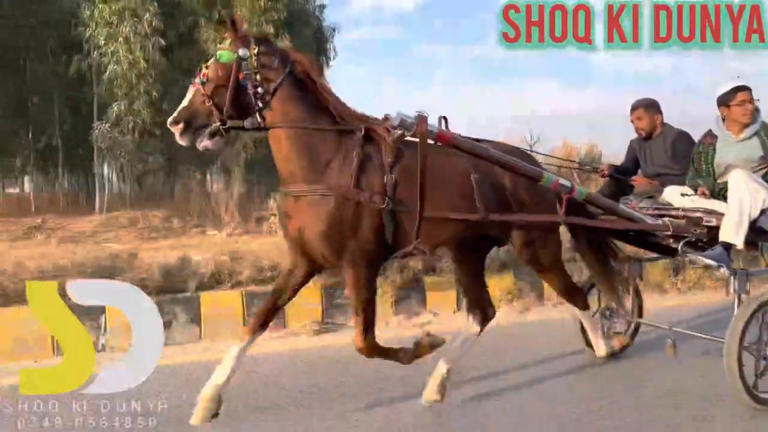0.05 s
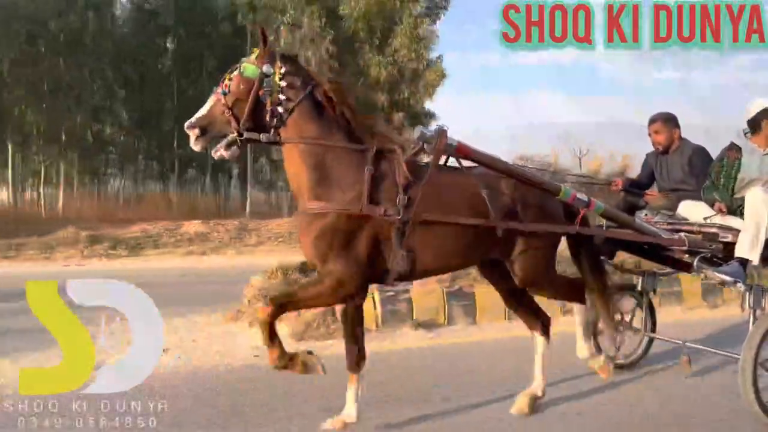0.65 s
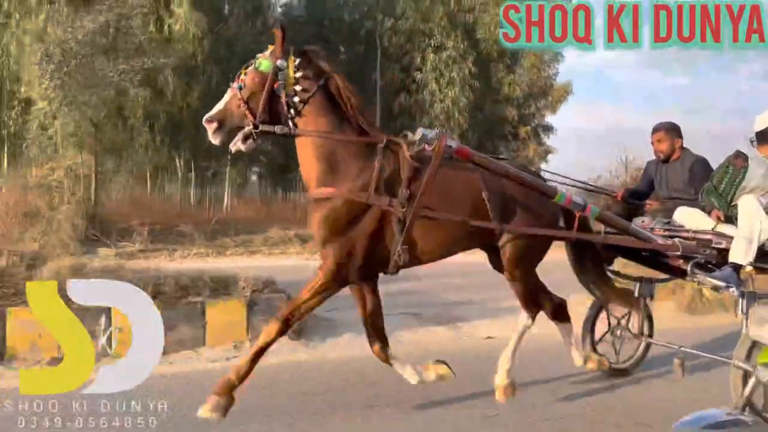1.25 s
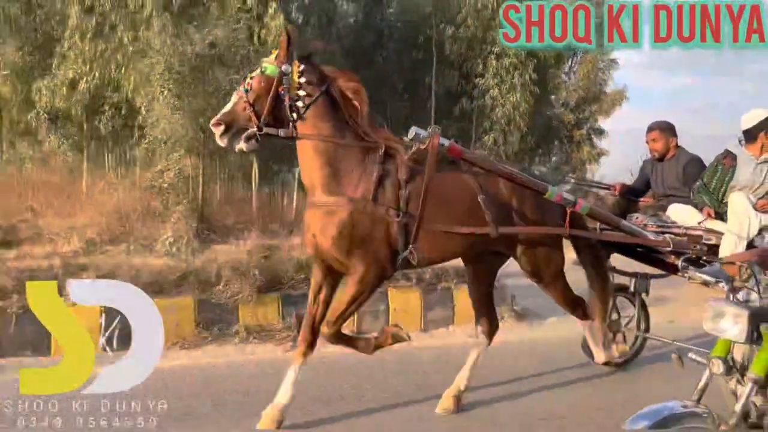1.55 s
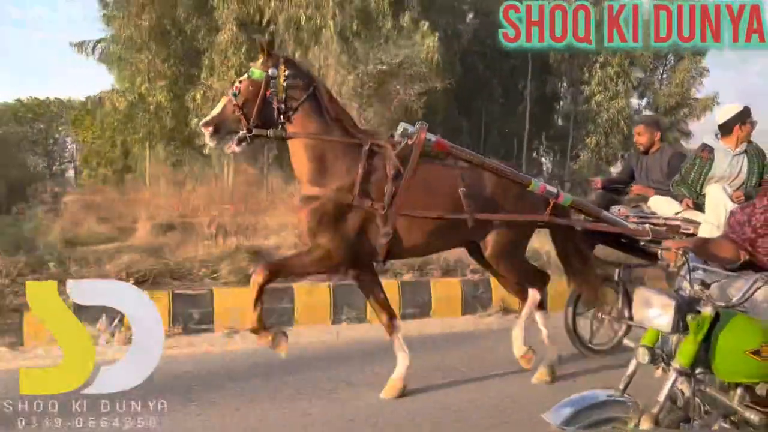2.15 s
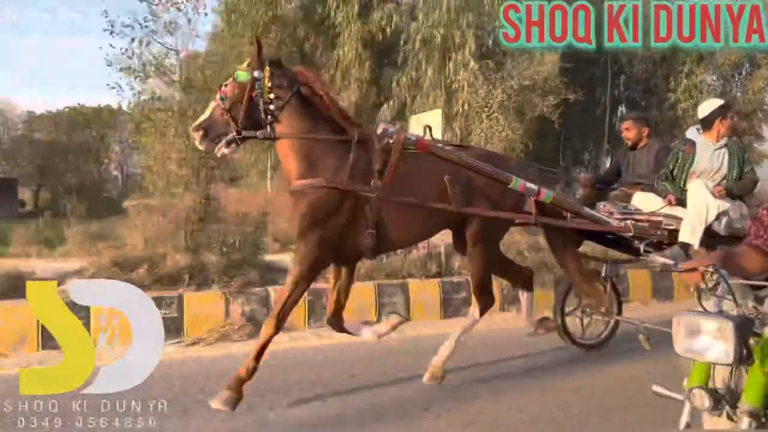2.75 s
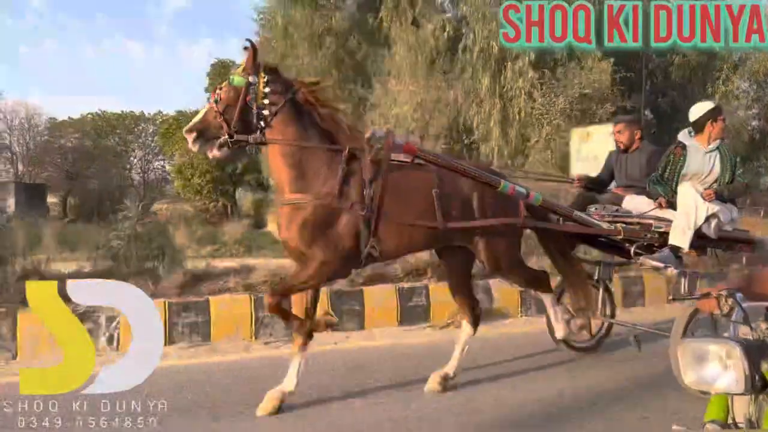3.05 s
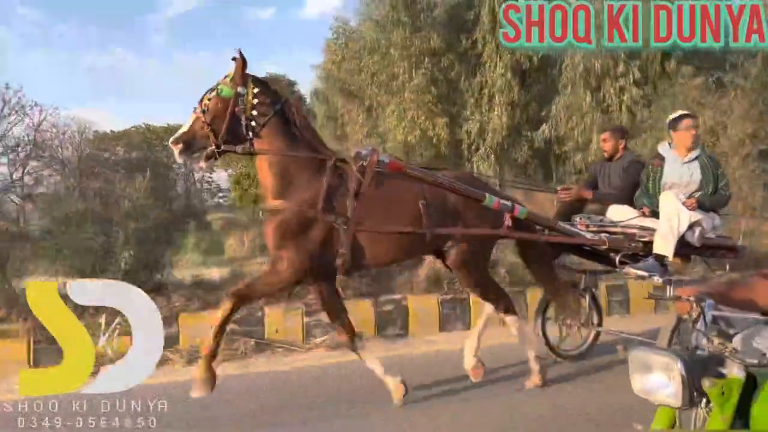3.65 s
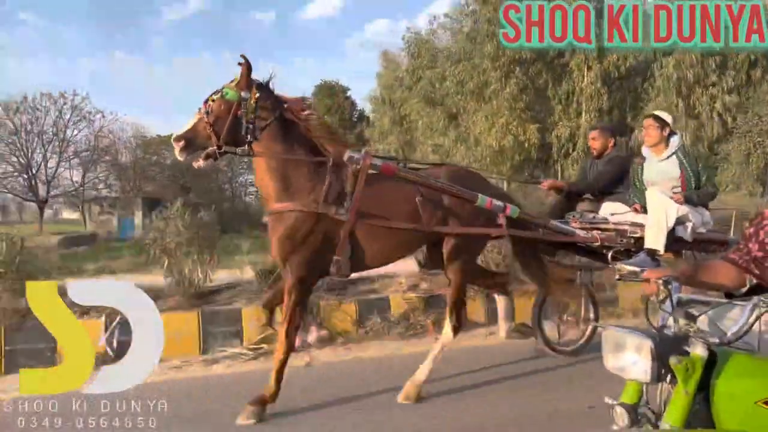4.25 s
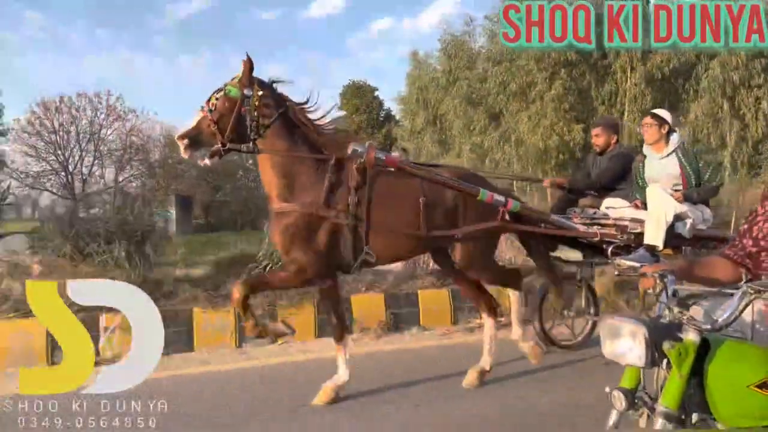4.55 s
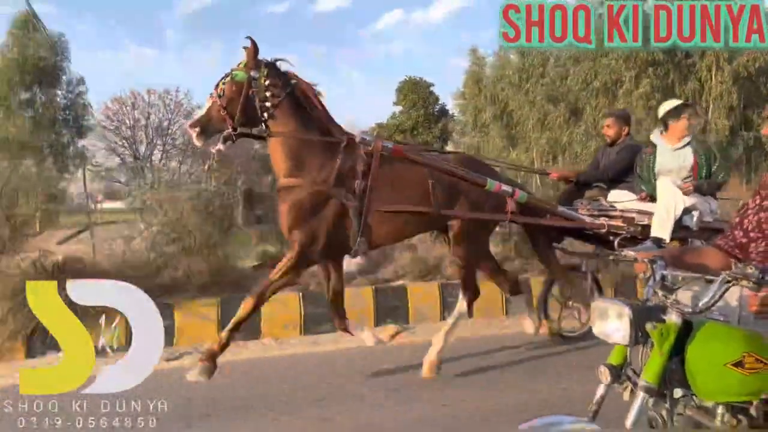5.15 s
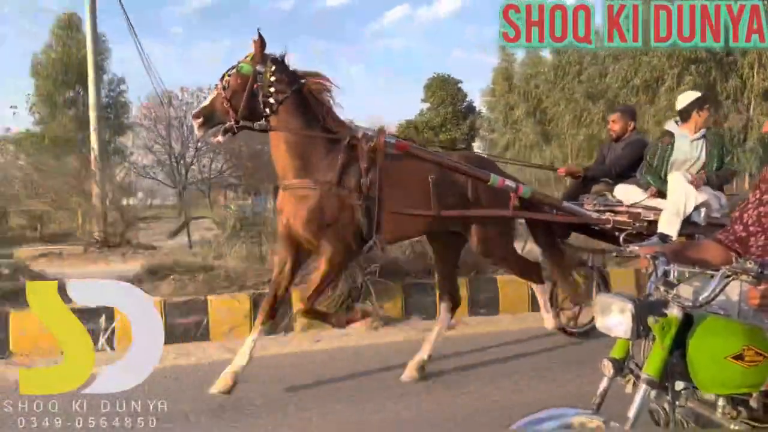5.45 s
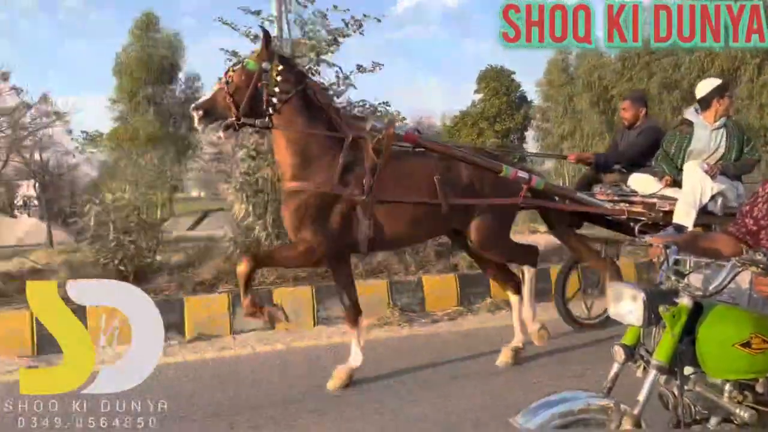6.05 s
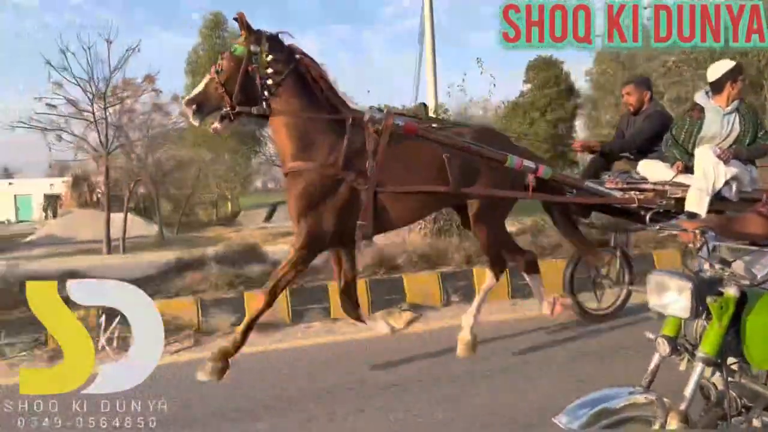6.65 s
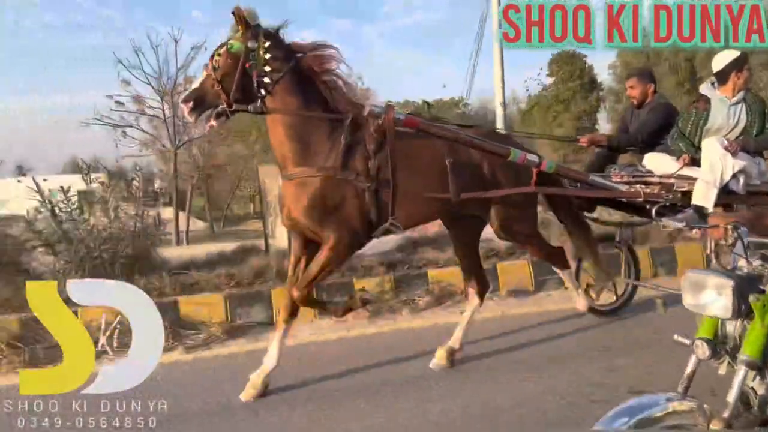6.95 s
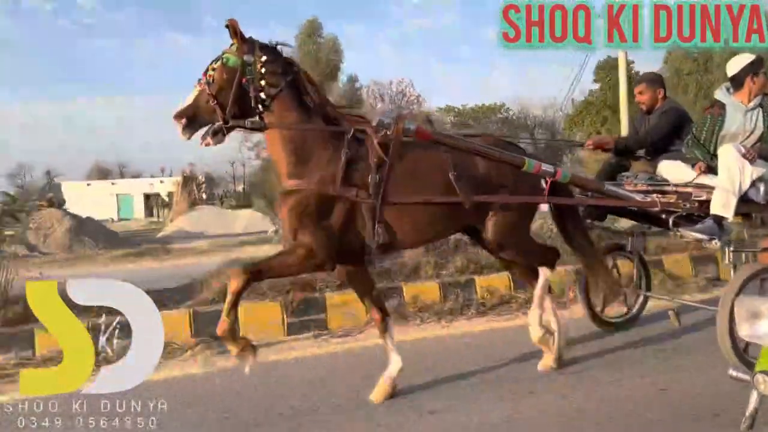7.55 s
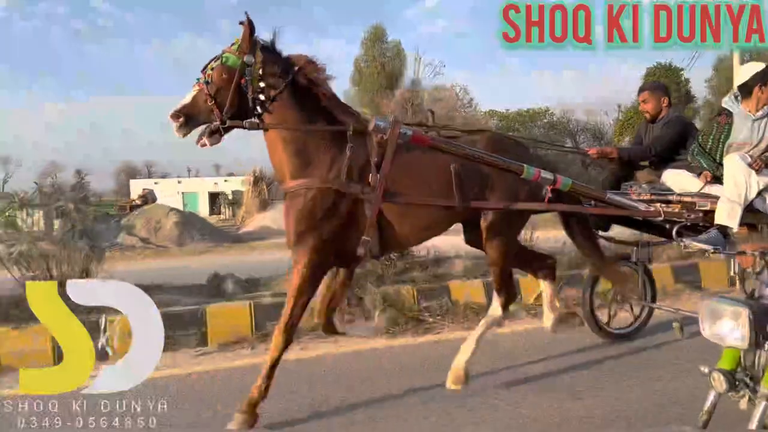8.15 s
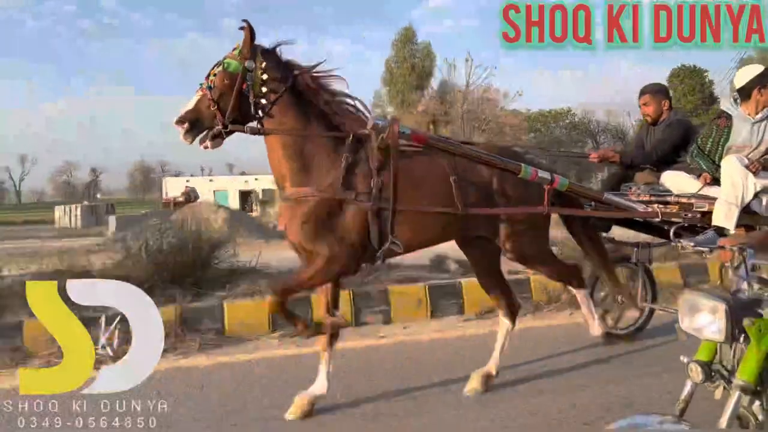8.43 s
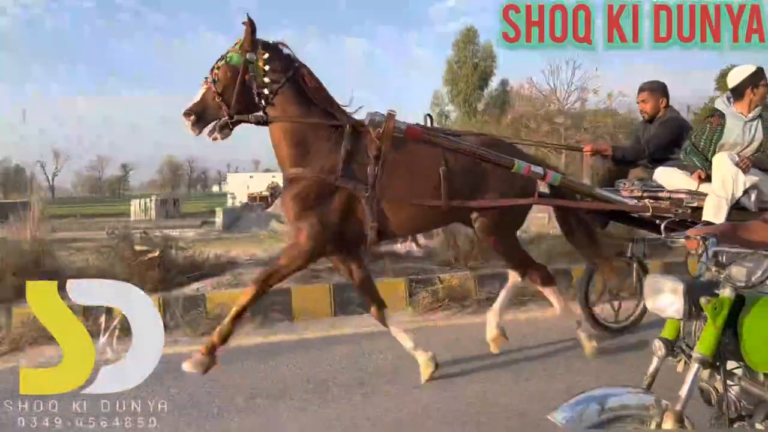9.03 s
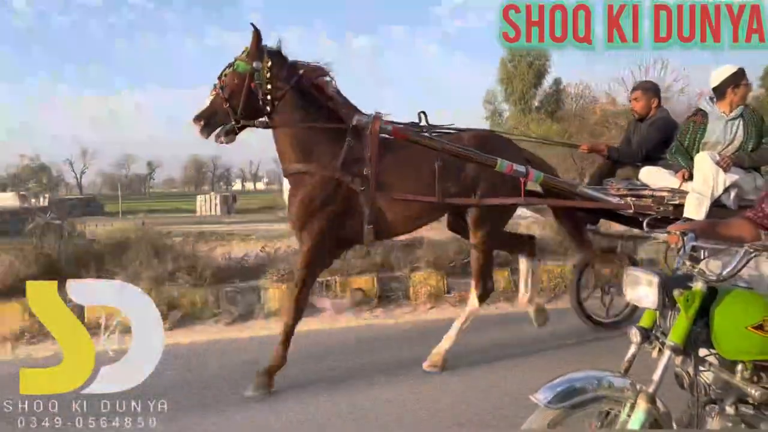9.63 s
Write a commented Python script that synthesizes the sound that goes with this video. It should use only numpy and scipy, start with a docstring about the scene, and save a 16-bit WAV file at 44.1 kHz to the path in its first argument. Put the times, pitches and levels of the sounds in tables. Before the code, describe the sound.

Sharp, hollow hoofbeats keep an even trot on a paved road from start to finish, mixed with small rattles and dull knocks from a cart. Beneath them run the low, steady putter of a motorcycle, a faint whine that comes and goes, and tyre noise. Everything is heard outdoors from a vehicle keeping pace, with wind rumbling on the microphone and stronger gusts early and late.

```python
"""On an asphalt road, a trotting horse pulls a light cart, heard from a vehicle that keeps pace with it.
The hooves land in pairs, one just after the other: iron shoes clack, hollow hooves clop, sand crunches.
The cart knocks and rattles. A one-cylinder motorcycle thumps alongside, one puff for each firing,
with a faint gear whine. Behind it all, tyres roar and hiss and gusts of wind hit the microphone."""
import sys
import numpy as np
from scipy import signal
from scipy.fft import rfft, irfft, next_fast_len
from scipy.io import wavfile
from scipy.ndimage import uniform_filter1d

SR = 44100
rng = np.random.default_rng(int(sys.argv[2]) if len(sys.argv) > 2 else 0)


def store_wav(level_fs):
    """Save 16-bit WAV to argv[1]."""
    pcm = np.round(np.clip(np.atleast_2d(level_fs), -1, 1) * 32767)
    wavfile.write(sys.argv[1], SR, pcm.T.astype(np.int16))


N = 431738
TIME = np.arange(N) / SR
SHORT_TIME = np.arange(4096) / SR  # clock for one short sound
SKID_S = .015  # a burst starts this long before its crack


# Tone colours of iron on stone, the dull body of the blow, and crushed sand: f/Hz, level/dB
CLACK_COLOUR = [(900, -3), (2000, 2), (3200, 11), (4600, 12), (5400, 11), (6700, 13.5), (8200, 5.5),
                (10000, -1), (14000, -38)]
CLOP_COLOUR = [(200, -15), (500, -1), (850, 11.5), (1200, 6), (1700, -8), (2600, 6), (4000, -56),
               (8000, -47)]
GRIT_COLOUR = [(5000, 1), (8500, 13), (10000, 5), (11300, 13.5), (13000, 2.5), (15500, 5.5), (16500, -34)]
# Light scuffs of a toe leaving the road: t/s, level/dB
TOE_SCUFFS = [(3.497, -29), (4.6464, -23), (6.4444, -25)]

def hooves():
    """The shoe's edge ticks, sand snaps, iron cracks on stone, then the hoof and the shoe ring."""
    usual_db, toe_ahead_s, snap_ahead_s = -29, .0075, .0007
    lean_left = amp([[1.6], [-1.9]])
    out = np.zeros((2, N))
    for s, db, extra_grit_db, clop_db, clop_hz, toe_db in landings():
        grit_db = usual_db + 6.5 + .35 * (db - usual_db)  # hard steps gain more clack than grit
        clack = amp(3.5) * burst(CLACK_COLOUR, lead=.002, decay=.0033, tail_db=-12, tail_decay=.011)
        clop = amp(-2) * burst(CLOP_COLOUR, lead=.002, decay=.0075, tail_db=-9, tail_decay=.016)
        snap_s = rng.uniform(.0008, .0016)
        grit = 1.6 * burst(GRIT_COLOUR, lead=.0004, decay=snap_s, tail_db=-19, tail_decay=.011)
        toe = burst(GRIT_COLOUR, lead=.0002, decay=.0012, tail_db=-10, tail_decay=.007)
        add(clack, SKID_S, shoe_ring())
        add(clop, SKID_S, hoof_ring(clop_hz))
        start = s - SKID_S
        add(out, start, (amp(db) * clack + amp(clop_db) * clop) * lean_left)
        add(out, start - snap_ahead_s, amp(grit_db + extra_grit_db) * grit)
        add(out, start - toe_ahead_s, amp(grit_db + toe_db) * toe)
    for s, db in TOE_SCUFFS:
        scuff = burst(CLACK_COLOUR, lead=.005, decay=.011, tail_db=-12, tail_decay=.014)
        add(out, s - SKID_S, amp(db - 13) * scuff)
    return out


# Beats of the trot, each made by a front hoof and the opposite back hoof. Columns:
# second hoof t/s; first hoof's head start t/s, level/dB;
# second hoof's level/dB, extra grit level/dB, clop level/dB, clop f/Hz
TROT = [(0.1503, 0.0215, -30, -20, 0, -26, 824), (0.395, 0.017, -33, -31, -11, -39, 640),
        (.634, 0.026, -27.5, -20, -4, -28, 816), (0.8972, 0.024, -37, -32, -3, -24, 820),
        (1.1174, 0.024, -27, -21, 1, -25, 1020), (1.4005, 0.037, -30.5, -35, 7.5, -42, 1720),
        (1.5898, 0.028, -63, -20.5, -1.5, -22.5, 716), (1.8491, 0.0055, -39, -36, -3, -32, 860),
        (2.0815, 0.008, -24.5, -18, -1, -23, 646), (2.339, .012, -32, -33, 1, -26.5, 950),
        (2.5859, 0.024, -26.5, -21.5, 0.5, -20.5, 940), (2.85, 0.025, -32, -29, -4, -40, 1030),
        (3.07, 0.0091, -27, -20, -7, -21, 1320), (3.3511, 0.039, -37, -28, 0, -26, 1020),
        (3.5504, 0.0071, -28, -19, -4, -16.5, 905), (3.835, .048, -36, -38, 2, -35, 900),
        (4.0341, 0.027, -55, -18, 0.5, -21.5, 1050), (4.3, 0.021, -34, -31, 2, -25, 840),
        (4.521, 0.0028, -25, -20.5, 5.5, -33, 1860), (4.7725, 0.012, -42, -29.5, 1, -32, 890),
        (5.0077, 0.004, -24.5, -22, 1, -20.5, 950), (5.2618, 0.0051, -34, -23.5, 3, -23, 1110),
        (5.5232, 0.026, -27, -22, 2, -23, 1480), (5.7714, 0.0082, -27, -27, 0, -36, 880),
        (6.0199, .026, -32, -21.5, 7, -38, 1150), (6.2879, 0.026, -32, -31, -4, -40, 800),
        (6.5118, 0.027, -30.5, -22, 4, -19, 703), (6.781, 0.029, -29.5, -30.5, 1, -37, 1020),
        (6.994, 0.024, -29, -19.5, 2.5, -17.5, 1000), (7.2601, 0.015, -27.5, -27, -2, -33, 1040),
        (7.497, 0.02, -27, -18, 4, -21.5, 596), (7.77, 0.043, -25, -33, -3, -27, 1050),
        (7.972, 0.021, -25, -25, 5, -14.5, 854), (8.251, 0.043, -30.5, -35, 1, -31, 1040),
        (8.4425, 0.0057, -27, -14.5, -2, -27, 1500), (8.699, 0.01, -29, -26.5, 0, -20, 854),
        (8.9417, 0.023, -22.5, -22, -4, -27, 840), (9.195, 0.033, -31.5, -32, -5, -35, 560),
        (9.4104, 0.008, -30, -23.5, 6, -20, 840), (9.664, 0.0019, -47, -27.5, -1, -27, 855)]

def landings():
    """Lists each touch of a shoe: t/s, level/dB, extra grit/dB, clop level/dB, clop f/Hz, toe tick/dB."""
    first_toe_db, second_toe_db = -4, -15  # the second hoof lands flatter, so it ticks less
    stray_click = (8.84, -21.5)  # between beats, perhaps one shoe catching another
    early = [(s - ahead, db) for s, ahead, db, *_ in TROT] + [stray_click]
    first = [(s, db, 0, db, 900 * rng.uniform(.76, 1.29), first_toe_db) for s, db in early]
    second = [(s, *blow, second_toe_db) for s, _, _, *blow in TROT]
    return first + second


# Ringing tones of the iron shoe: f/Hz, level/dB
SHOE_TONES = [(1550, -9), (1900, -7), (2450, -7), (3450, -8), (4400, -13), (6200, -6), (7100, -8),
              (8500, -9)]

def shoe_ring():
    """The shoe rings briefly against the road, with a different mix of tones on each landing."""
    ring_cycles = 17  # every tone fades over this many swings, so high ones die first
    hz, db = np.transpose(SHOE_TONES)[:, :, None]
    bend, strength = rng.standard_normal((2, len(SHOE_TONES), 1))
    phase = 2 * np.pi * rng.random((2, len(SHOE_TONES), 1))  # each side hears it from its own angle
    tones = amp(db + 2.2 * strength) * np.sin(2 * np.pi * hz * (1 + .04 * bend) * SHORT_TIME + phase)
    return (tones * np.exp(-SHORT_TIME * hz / ring_cycles)).sum(axis=1)


# Ringing tones of the hoof wall: multiple of the clop's pitch, level/dB
HOOF_TONES = [(1, 6), (1.55, -5), (2.2, -14)]

def hoof_ring(hz):
    """The hollow hoof rings for a moment, at a pitch that depends on how it meets the road."""
    rise_s, decay_s = .001, .005
    right_delay_s = .0002  # the horse is ahead and to the left
    t = SHORT_TIME
    ratio, db = np.transpose(HOOF_TONES)[:, :, None]
    bend, phase = rng.uniform(-1.08, 1, (2, len(HOOF_TONES), 1))
    arrival = np.array([t, t - right_delay_s])[:, None]
    tones = amp(db) * np.sin(2 * np.pi * hz * ratio * (1 + .04 * bend) * arrival + np.pi * phase)
    return tones.sum(axis=1) * (1 - np.exp(-t / rise_s)) * np.exp(-t / decay_s)


def stones():
    """Just after each landing, two small stones are crushed under the rolling shoe."""
    out = np.zeros((2, N))
    for s, *_ in landings():
        for delay_s, db in rng.uniform([0, -35], [.015, -27], (2, 2)):
            tick = burst(CLACK_COLOUR, lead=.0005, decay=.002, tail_db=-13, tail_decay=.009)
            sand = .7 * burst(GRIT_COLOUR, lead=.0004, decay=.0012, tail_db=-18, tail_decay=.008)
            add(out, s + delay_s - SKID_S, amp(db) * (tick + sand))
    return out


# Knocks from the cart, and one hoof's toe tapping the road at 7.949 s: t/s, level/dB
DULL_KNOCKS = [(2.711, -17), (2.735, -19), (2.759, -17.5), (5.208, -18.5), (5.319, -20), (5.337, -12.5),
               (6.154, -19), (6.644, -16.5), (7.949, -18), (8.324, -16)]
# Tone colour of a knock: f/Hz, level/dB
KNOCK_COLOUR = [(250, -13), (600, 9), (1200, 6), (1800, 3), (3000, -12), (5000, -45), (10000, -50)]

def cart_and_toe_tap():
    """Short, dull knocks and many light rattles from the cart, and one hoof's toe tapping the road."""
    out = np.zeros((2, N))
    rattles = [(when * N / SR, -31 + 5 * size) for when, size in rng.random((110, 2))]
    for s, db in list(DULL_KNOCKS) + rattles:
        knock = burst(KNOCK_COLOUR, lead=.003, decay=.0025, tail_db=-13, tail_decay=.012)
        add(out, s - SKID_S, amp(db) * knock)
    return out


# How often the engine fires: t/s, f/Hz
FIRING_RATE = [(0, 23.2), (1.1, 24.0), (1.9, 23.5), (2.4, 23.85), (2.9, 23.45), (3.4, 23.45), (3.9, 23.95),
               (4.4, 23.8), (4.8, 23.5), (6.2, 23.1), (6.8, 23.1), (7.1, 22.95), (8.1, 23.55), (8.4, 23.55),
               (9.3, 23.85), (9.79, 23.6)]

def engine_cycles():
    """A running count that climbs by one from each firing of the engine to the next."""
    return np.cumsum(curve(FIRING_RATE) * (TIME > .005)) / SR


# Tones the exhaust pipe rings at: f/Hz, level/dB
PIPE_TONES = [(135, 1.5), (290, -15)]
# The exhaust swelling and sinking, with a few loud firings: t/s, level/dB
EXHAUST_LOUDNESS = [(0, -23), (.18, -30.5), (.3, -19), (.88, -16), (1.68, -27), (2.2, -25.5), (2.55, -17.5),
                    (2.62, -31.5), (3.13, -22), (3.19, -22), (3.28, -23.5), (4.2, -29), (4.5, -23.5),
                    (5.6, -23), (5.65, -15.5), (5.8, -26), (7, -23), (7.12, -13), (7.17, -25.5),
                    (7.5, -19.5), (8.05, -17.5), (8.18, -23.5), (9.2, -24), (9.43, -19.5), (9.79, -24)]

def exhaust(cycles):
    """Each firing sends a puff through the pipe, a little uneven in strength, timing and pitch."""
    peak_s, pitch_spread = .0125, .04
    firings = np.flatnonzero(np.diff(np.floor(cycles + .015 * wander(12))) > 0)
    swell = (SHORT_TIME / peak_s * np.exp(1 - SHORT_TIME / peak_s)) ** 3.5
    puffs = np.zeros(N)
    for sample, (strength, bend) in zip(firings, rng.standard_normal((len(firings), 2))):
        bent_time = SHORT_TIME + pitch_spread * bend * (SHORT_TIME - peak_s)
        pipe = sum(amp(db) * np.sin(2 * np.pi * hz * bent_time) for hz, db in PIPE_TONES)
        add(puffs, sample / SR, amp(1.5 * strength) * swell * pipe)
    sway_db = 1.7 * wander(21) * np.array([[1], [-1]])  # moving air tugs the sound left and right
    return unit(puffs) * amp(curve(EXHAUST_LOUDNESS) + sway_db)


# The gear whine coming and going: t/s, level/dB
WHINE_LOUDNESS = [(0, -60), (2.8, -56), (3.5, -37), (3.8, -43), (4.2, -44), (4.37, -28.5), (4.52, -48),
                  (4.9, -34.5), (5.3, -40), (6.1, -42), (6.35, -32), (6.9, -33), (7.1, -29), (7.9, -28),
                  (8.4, -31), (9.0, -41), (9.6, -31)]

def gear_whine(cycles):
    """Gear teeth meet so fast that they make a fuzzy tone, shaken by each firing."""
    teeth_per_firing = 44.62
    tone = np.sin(2 * np.pi * teeth_per_firing * cycles + .6 * wander(14))
    fuzz = .55 * fuzzy_tone(teeth_per_firing * curve(FIRING_RATE), width_hz=36)
    throb = 1 + .45 * np.cos(2 * np.pi * cycles)
    return amp(curve(WHINE_LOUDNESS) - 1.5 + wander(6.8)) * unit((tone + fuzz) * throb)


# Ringing tones of the engine's outer shell: f/Hz, level/dB
CASING_TONES = [(1290, -49.5), (1715, -43.5), (2480, -55)]

def engine_casing(cycles):
    """The engine's shell rings with every firing, more so when the gears work hard and whine."""
    whine_db = curve(WHINE_LOUDNESS)
    throb = 1 + .5 * np.cos(2 * np.pi * cycles)
    rings = sum(amp(db) * fuzzy_tone(np.full(N, hz), width_hz=28) for hz, db in CASING_TONES)
    return rings * throb * amp(.25 * (whine_db - whine_db.mean()))


# Tyre roar and engine clatter together: t/s, level/dB
ROAR_LOUDNESS = [(0, -29), (1.8, -29), (2.8, -26.5), (5, -27), (6.6, -27), (8.3, -26.5), (9.79, -26.5)]
# Tone colours of the roar and of the tyres' hiss: f/Hz, level/dB
ROAR_COLOUR = [(40, -19), (300, 6.5), (430, -15), (650, 0), (900, 2), (1150, 0), (1520, -2), (1900, -5.5),
               (2600, -6.5), (3600, -12), (8000, -32.5)]
HISS_COLOUR = [(2000, 8), (3500, 16), (6100, 21.5), (7200, 13.5), (8600, 21.5), (11500, 2.5), (13000, -30)]

def tyres(cycles):
    """Tyres roar and hiss on rough asphalt; the engine's clatter pulses through the roar."""
    texture_db = 1.3 * wander(70) + .7 * wander(9) + .4 * np.cos(2 * np.pi * cycles)
    roar_db = curve(ROAR_LOUDNESS)
    follow_db = .5 * (roar_db - roar_db.mean())
    roar = noise(ROAR_COLOUR) * amp(roar_db - 1.5 + texture_db)
    hiss = noise(HISS_COLOUR) * amp(-43 + follow_db + 2 * wander(37))
    return roar + hiss


# Gusts tearing at the microphone, and the hard slaps of air within them: t/s, level/dB
GUST_LOUDNESS = [(0, -27), (.22, -34.5), (.62, -31.5), (.68, -23), (1.16, -26), (1.4, -34), (1.56, -26.5),
                 (2.5, -38.5), (5.3, -39), (6.15, -30.5), (6.85, -31.5), (7.8, -26), (7.88, -25),
                 (8.11, -19), (8.19, -25), (8.35, -21.5), (8.6, -27), (9, -32.5), (9.79, -27)]
AIR_SLAPS = [(.985, -20.5), (1.16, -25), (7.892, -19.5), (7.998, -19), (8.1, -21)]
# Tone colours of the gusts and of the low rumble: f/Hz, level/dB
GUST_COLOUR = [(20, -45), (100, -14), (200, 1.5), (310, -0.5), (500, -1.5), (750, -5), (1100, -12.5),
               (2500, -24.5), (5000, -60)]
RUMBLE_COLOUR = [(20, -36), (30, -21), (42, -1), (90, 4.5), (130, 8.5), (175, -2), (215, -22), (500, -39.5)]

def wind():
    """Air beats on the microphone: a rumble that grows with the wind, ragged gusts and hard slaps."""
    slap_rise_s, slap_hz = .014, 480
    gust_db = curve(GUST_LOUDNESS)
    follow_db = .15 * (gust_db - gust_db.mean())
    rumble = noise(RUMBLE_COLOUR) * amp(-23 + follow_db + 2 * wander(8.9))
    ragged_db = 2.4 * wander(55)
    out = rumble + noise(GUST_COLOUR) * amp(gust_db + ragged_db)
    t = np.arange(8192) / SR
    swell = t / slap_rise_s * np.exp(1 - t / slap_rise_s)
    slap_colour = [(slap_hz / 4, -30), (slap_hz, 0), (slap_hz * 2, -10), (slap_hz * 8, -60)]
    for s, db in AIR_SLAPS:
        add(out, s - slap_rise_s, amp(db) * swell * noise(slap_colour, size=len(t)))
    return out


# Pitch and loudness of a thin whistle: t/s, f/Hz, level/dB
AIR_WHISTLE = [(0, 2230, -40), (.8, 2150, -39.5), (1.1, 2200, -39), (1.4, 2150, -52), (6.001, 2140, -46),
               (6.5, 2113, -38.5), (8.3, 2134, -40), (9, 2086, -44)]

def whistle():
    """A faint, breathy whistle comes and goes in the moving air."""
    rows = np.array(AIR_WHISTLE)
    hz, db = curve(rows[:, :2]), curve(rows[:, [0, 2]])
    return amp(db) * fuzzy_tone(hz, width_hz=130)


# How alike the microphone's left and right openings sound: f/Hz, likeness from 0 to 1
SIDE_LIKENESS = [(60, .52), (850, .6), (1500, .25), (5000, .25), (8000, .6), (10200, .97), (12000, .8),
                 (14000, .92)]

def noise(colour, size=N, uneven_db=0):
    """Stereo noise with the given tone colour; uneven_db adds random broad bumps to that colour."""
    length = next_fast_len(size, True)
    hz = np.fft.rfftfreq(length, 1 / SR)
    left, other = rfft(rng.standard_normal((2, length)))
    same = np.clip(value_at(SIDE_LIKENESS, hz), 0, 1)
    right = same * left + np.sqrt(1 - same ** 2) * other
    bumps = np.interp(hz, np.linspace(0, SR / 2, num=48), rng.standard_normal(48))
    spectrum = np.array([left, right]) * amp(value_at(colour, hz) + uneven_db * bumps)
    return unit(irfft(spectrum, length)[:, :size])


def burst(colour, lead, decay, tail_db, tail_decay):
    """One gritty blow: a short skid, a crack, a weaker tail. Lead and both decays are in seconds."""
    t = SHORT_TIME - SKID_S
    skid = .4 * np.exp(-abs(t) / lead)
    crack_and_tail = np.exp(-abs(t) / decay) + amp(tail_db) * np.exp(-abs(t) / tail_decay)
    shape = uniform_filter1d(np.where(t < 0, skid, crack_and_tail), size=12)
    grains_db = 2.8 * unit(uniform_filter1d(rng.standard_normal(len(t)), size=50))
    blow = shape * amp(grains_db) * noise(colour, size=len(t), uneven_db=3)
    return unit(blow) * np.sqrt(np.mean(shape ** 2))  # chance shapes the blow but not its energy


def fuzzy_tone(hz, width_hz):
    """A narrow band of noise around the pitch hz, made separately for left and right."""
    phase = 2 * np.pi * np.cumsum(hz) / SR
    sides = [wander(width_hz) * np.sin(phase) + wander(width_hz) * np.cos(phase) for _ in range(2)]
    return unit(np.array(sides))


def wander(hz):
    """A smooth random wobble of typical size 1, with up to about hz swings a second."""
    f = np.fft.rfftfreq(2 ** 19, 1 / SR)
    spectrum = rfft(rng.standard_normal(2 ** 19)) / (1 + (f / hz) ** 4)
    return unit(irfft(spectrum)[:N])


def amp(db):
    """Turns decibels into a number to multiply by."""
    return 10 ** (np.asarray(db) / 20)


def unit(x):
    """Scales a signal so its typical size (rms) is 1."""
    return x / np.sqrt(np.mean(x ** 2) + 1e-20)


def value_at(points, hz):
    """Looks up a frequency table between its rows, with the octaves evenly spaced."""
    f, value = np.transpose(points)
    return np.interp(np.log(hz + 1), np.log(f + 1), value)


def curve(rows):
    """Joins (time, value) points with straight lines."""
    return np.interp(TIME, *np.transpose(rows))


def add(mix, s, sound):
    """Mixes a sound in at s seconds."""
    part = mix[..., max(round(s * SR), 0):][..., :sound.shape[-1]]
    part += sound[..., :part.shape[-1]]


def scene():
    """Horse, cart and motorcycle travel with the listener, so nothing passes by."""
    cycles = engine_cycles()
    horse_and_cart = hooves() + stones() + cart_and_toe_tap()
    motorcycle = exhaust(cycles) + gear_whine(cycles) + engine_casing(cycles)
    return horse_and_cart + motorcycle + whistle() + tyres(cycles) + wind()


# How far the wave at the left opening runs ahead of the right: f/Hz, phase/rad
LEFT_LEAD = [(1000, 0), (5000, .2), (7000, 1.2), (8200, 0), (10300, -3.1), (12000, -6.2), (13900, -9.4),
             (15600, -12.4)]

def record(dry):
    """The microphone's spaced openings shift the treble between sides; peaks and extremes are trimmed."""
    low_cut_hz, high_cut_hz, ceiling = 30, 16300, .9
    hz = np.fft.rfftfreq(2 ** 19, 1 / SR)
    left, right = rfft(dry, 2 ** 19) * hz ** 4 / (hz ** 4 + low_cut_hz ** 4)
    lag = np.exp(-1j * np.interp(hz, *np.transpose(LEFT_LEAD)))
    sides = irfft(np.array([left, right * lag]))[:, :N]
    rounded = sides / (1 + (sides / ceiling) ** 8) ** (1 / 8)  # gently flattens the loudest peaks
    high_cut = signal.firwin(255, high_cut_hz, window=("kaiser", 9), fs=SR)
    return signal.oaconvolve(rounded, high_cut[None], "same")


dry = scene()
out = record(dry)
store_wav(out)
```